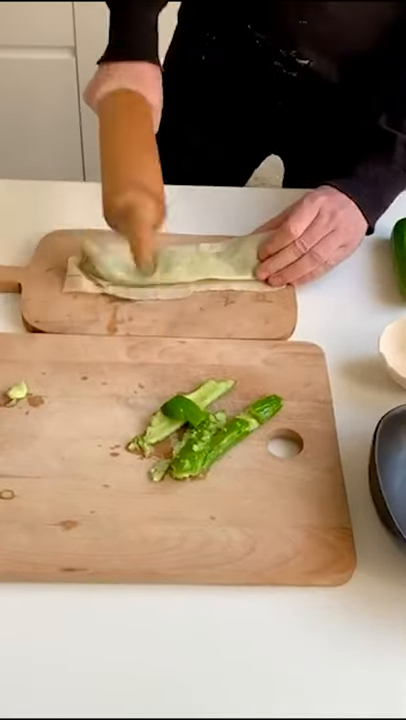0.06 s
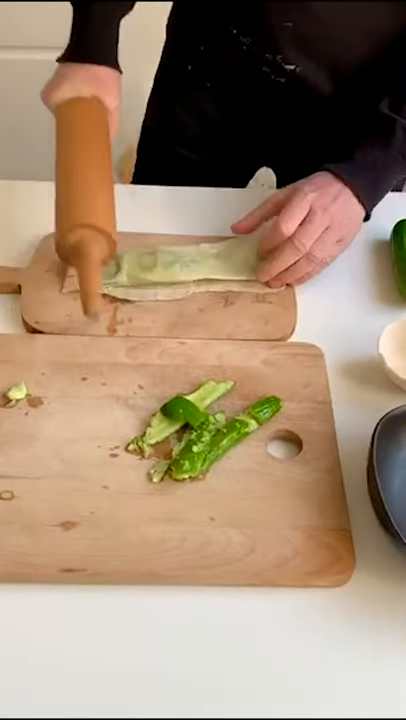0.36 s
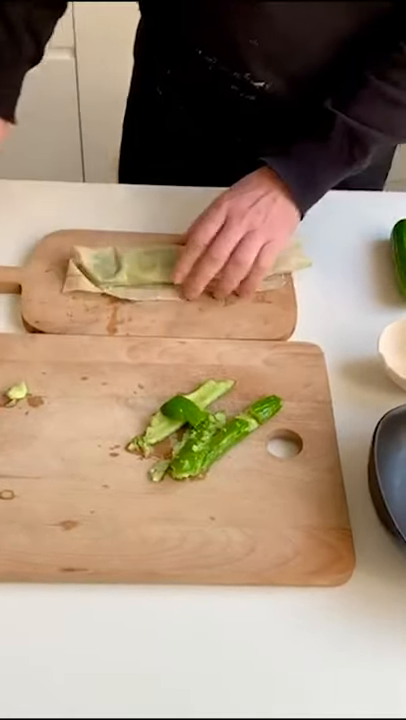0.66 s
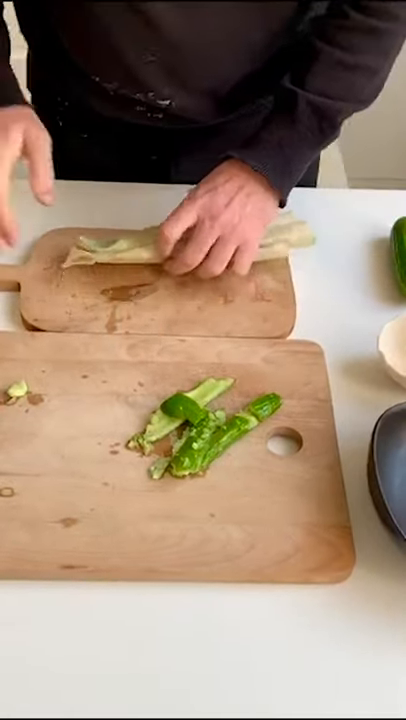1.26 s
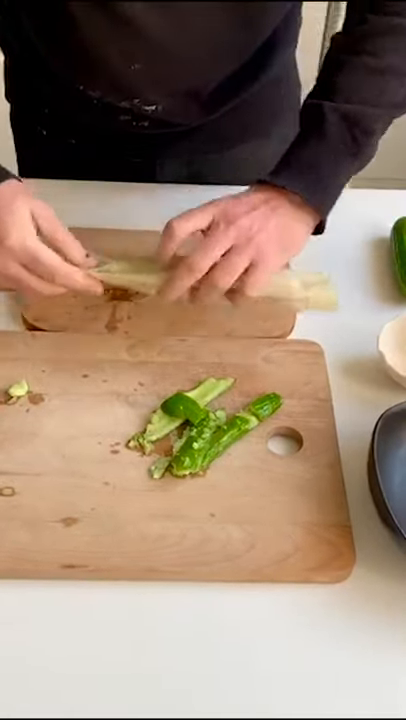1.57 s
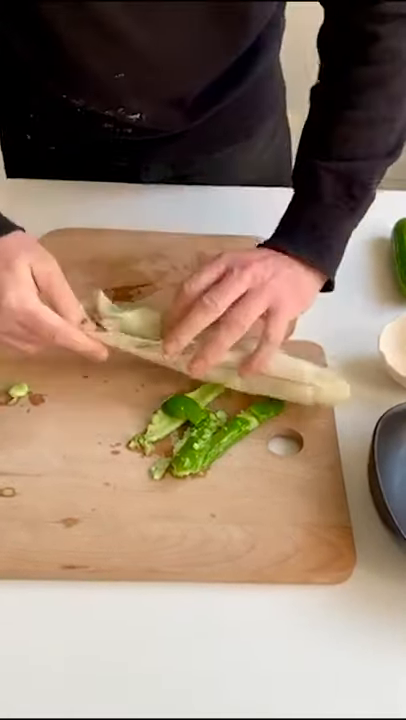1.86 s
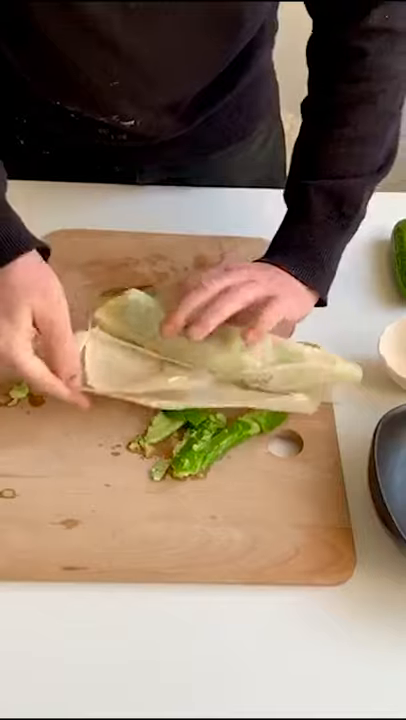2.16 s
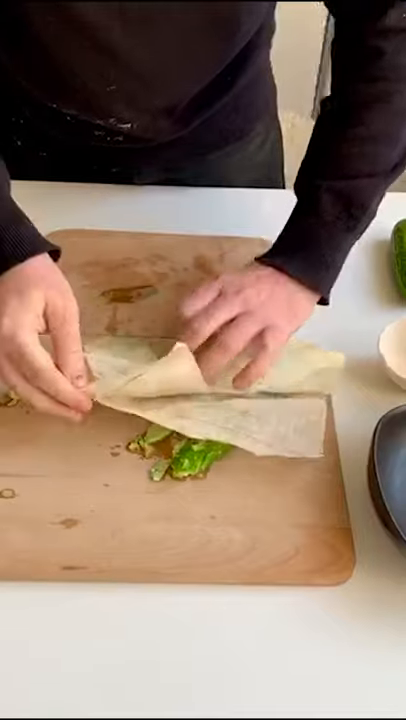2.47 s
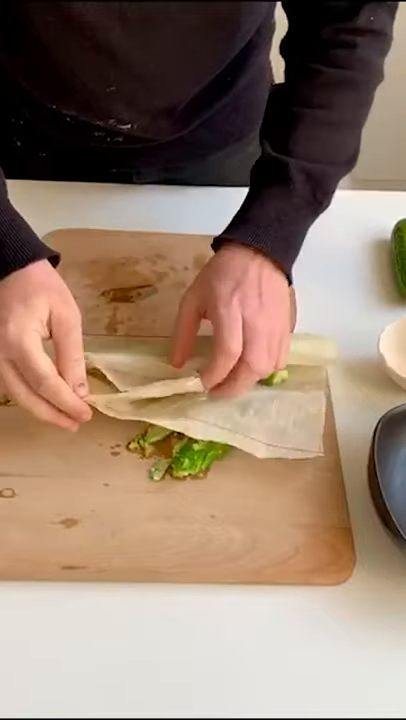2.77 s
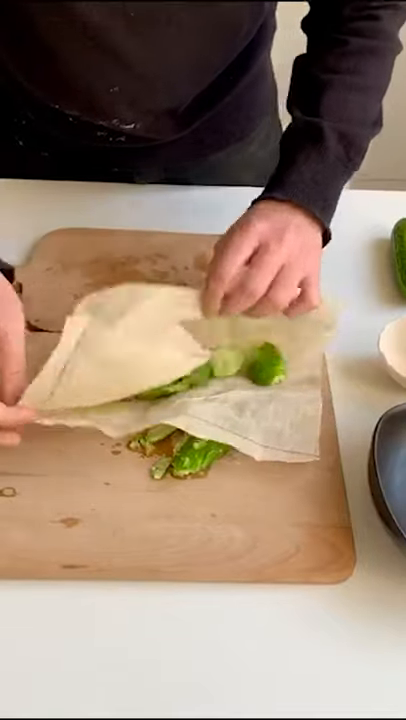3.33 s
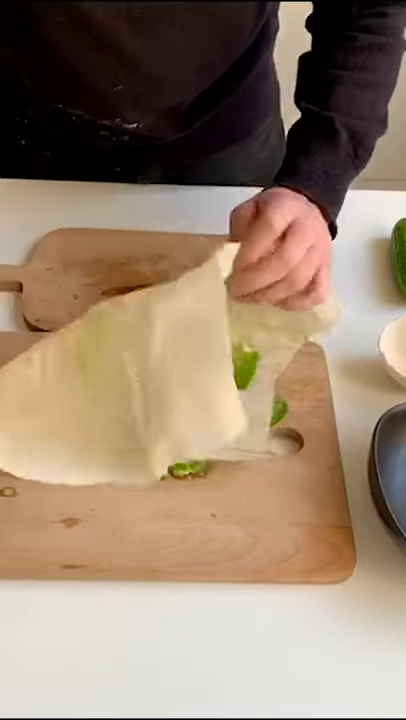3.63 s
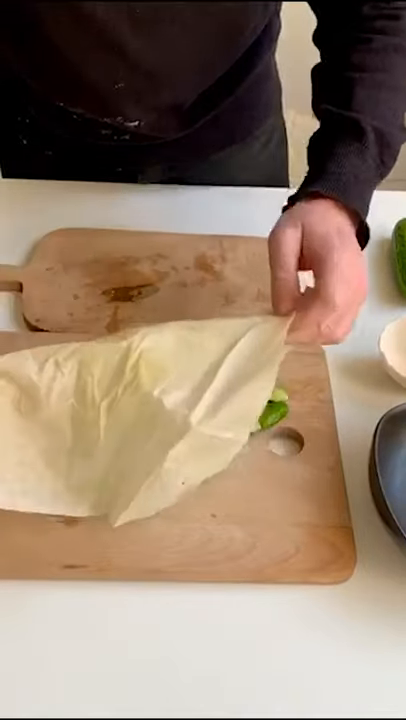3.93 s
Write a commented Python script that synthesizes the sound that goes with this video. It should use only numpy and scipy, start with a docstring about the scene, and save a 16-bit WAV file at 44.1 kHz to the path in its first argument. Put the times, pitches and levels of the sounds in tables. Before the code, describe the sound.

A wooden rolling pin thuds heavily on cloth-wrapped vegetables, strikes again more lightly, then is put down with two knocks. The wrap rustles faintly open and pieces drop softly onto the board in an echoing kitchen.

```python
"""A wooden rolling pin thuds on cloth-wrapped vegetables on a board, and the worktop booms under it.
The pin is put down with two knocks. Then the wrap is lifted, rustles open with small wet slips and
drops its pieces softly on the board. The place is a very live kitchen with a low hush, heard in
stereo, with the microphone far enough back that the room is about as loud as the direct knocks."""
import sys
import numpy as np
from scipy import signal
from scipy.fft import rfft, irfft
from scipy.io import wavfile
from scipy.ndimage import uniform_filter1d

SR = 44100
rng = np.random.default_rng(int(sys.argv[2]) if len(sys.argv) > 2 else 0)


def store_wav(level_fs):
    """Save 16-bit WAV to argv[1]."""
    pcm = np.round(np.clip(np.atleast_2d(level_fs), -1, 1) * 32767)
    wavfile.write(sys.argv[1], SR, pcm.T.astype(np.int16))


N = 176400
LEAD = SR // 10  # run-in before time zero [samples]
M = N + LEAD

# blows of the pin: (time [s], level [dB], bass [dB], clack [dB], crack [dB], contact [s], boom [dB])
KNOCKS = [(-.008, 9, 1.5, 6.5, 10, 0.0041, -17.5), (.007, 1, 10, -0.5, 8.5, 0.0021, -20),
          (.279, -6.5, 7, 6.5, 1.5, 0.0054, -76), (.33, -19.5, 15, -2.5, 12.5, 0.0031, -46),
          (0.8161, 3, 0.5, -2.5, -3, 0.003, -57), (0.993, -0.5, 4.5, 1, -4.5, .0035, -48.5)]
# ringing modes of board and pin: (frequency [Hz], level [dB])
WOOD_MODES = [(150, -10), (305, -7.5), (390, -8.5), (500, -4.5), (985, -7), (1400, -15), (3070, -22.5),
              (6660, -31.5)]
# spectrum of the push into the board: (frequency [Hz], level [dB])
PUSH_SPECTRUM = [(25, -20.5), (60, -2), (230, 0.5), (490, 4), (720, -2.5), (1000, -1), (1600, -9),
                 (2300, -15.5), (3800, -24.5), (15000, -49.5)]
# spectrum of the first touch of wood on wood: (frequency [Hz], level [dB])
CRACK_SPECTRUM = [(600, -27), (2500, -4), (7000, -15.5), (15000, -30)]
# kitchen reverberation: (frequency [Hz], time to fall 60 dB [s])
ROOM_T60 = [(60, 1.1), (300, 0.95), (1000, 1.044), (2500, 0.87), (6000, 0.53), (14000, 0.63)]
# what the walls return: (frequency [Hz], level [dB])
ROOM_COLOUR = [(70, -3.5), (230, 0), (450, 0), (720, -0.5), (1400, 0.5), (8000, -6)]
# likeness of the room sound left and right: (frequency [Hz], correlation [0-1])
LIKENESS = [(120, .993), (300, .9), (550, .5), (1000, .25), (1800, .4), (3000, .6), (4700, .9)]
# room tone: (frequency [Hz], level [dB])
HUSH_SPECTRUM = [(25, -14), (50, 0.5), (400, -9), (1000, -25.5), (3000, -30.5), (6000, -41), (15000, -56.5)]
# strokes of the wrap: (middle time [s], half length [s], level [dB], treble [dB])
RUSTLES = [(.035, 0.03, -28.5, -43), (0.259, 0.014, -30, -9), (1.464, 0.031, -71.5, 4),
           (1.656, 0.1, -75, 5), (1.883, 0.044, -63.5, 8), (2.154, 0.13, -71, -1), (2.36, 0.11, -70, 2),
           (2.581, 0.2, -68, -8), (2.869, 0.042, -65, 1), (3.131, 0.11, -68.5, 0),
           (3.383, 0.034, -64.5, 11), (3.78, 0.12, -67, -3.5)]
# snaps of vegetable and wrap: (time [s], level [dB], treble [dB])
SNAPS = [(.052, 6, -27), (0.078, -8, -4), (0.258, -17, 0), (2.509, -24, -25), (2.833, -34, -2.5),
         (2.868, -38.5, -14.5), (3.018, -47, -4.5), (3.157, -32, -4), (3.391, -29.5, -4), (3.708, -31, -19),
         (3.868, -33.5, -14)]
# colour of all rustles and snaps: (frequency [Hz], level [dB])
WRAP_SPECTRUM = [(200, -44.5), (600, 4), (1400, -4.5), (2500, -6), (3500, -1), (6000, -4), (8500, -12.5),
                 (11000, -14.5), (15000, -20.5)]
# pieces and fingers landing on the board: (time [s], level [dB], hollow pitch [Hz], boom [dB])
LANDINGS = [(1.869, -36.5, 404, -60), (2.192, -29.5, 243, -58), (2.451, -24.5, 776, -50),
            (2.544, -29.5, 292, -51.5), (3.191, -33.5, 249, -50.5), (3.803, -28, 872, -71.5)]
# spectrum of a cushioned landing: (frequency [Hz], level [dB])
LANDING_SPECTRUM = [(30, 2), (100, 24.5), (350, 23.5), (700, 7.5), (1500, 2), (4000, -34)]
# wet vegetable peeling off the wrap: (time [s], pitch [Hz], level [dB])
SQUELCHES = [(2.835, 905, -60.5), (2.871, 1254, -61), (3.352, 1450, -60.5), (3.378, 1667, -54),
             (3.389, 2268, -52)]
# phase between left and right, changing with frequency: (frequency [Hz], lead of the left [rad])
STEREO_PHASE = [(20, 0), (480, 0), (1000, -.6), (1400, -.3), (1800, 1.9), (2500, 2.3), (3700, 1.6),
                (4700, 3.14)]


def amp(db):
    """Decibels to gain."""
    return 10 ** (np.asarray(db) / 20)


def unit(x):
    """Scales to rms 1."""
    return x / np.sqrt(np.mean(x ** 2) + 1e-20)


def read(points, hz):
    """Reads a table on a log-frequency axis."""
    f, value = np.transpose(points)
    return np.interp(np.log(hz + 1), np.log(f + 1), value)


def add(mix, s, sound):
    """Mixes a sound in at time s."""
    part = mix[max(LEAD + round(s * SR), 0):][:len(sound)]
    part += sound[:len(part)]


def colour(x, points, size=4096):
    """Causal filter through (frequency [Hz], level [dB]) points."""
    log_gain = np.log(amp(read(points, abs(np.fft.fftfreq(size, 1 / SR)))))
    taps = np.fft.ifft(np.exp(np.conj(signal.hilbert(log_gain)))).real[:size // 2]
    return signal.fftconvolve(x, taps)[:len(x)]


def pair(a, b):
    """Two unrelated signals become a stereo pair, alike in the bass."""
    likeness = read(LIKENESS, np.fft.rfftfreq(len(a), 1 / SR))
    mid = rfft(a) * np.sqrt((1 + likeness) / 2)
    side = rfft(b) * np.sqrt((1 - likeness) / 2)
    return irfft([mid + side, mid - side], len(a))


def burst(t, fall_s):
    """A dying flurry of tiny contacts, energy 1."""
    x = rng.standard_normal(len(t)) * np.exp(-t / fall_s)
    return x / np.linalg.norm(x)


def crush(t, fall_s):
    """A contact that builds and lets go, even across the spectrum, energy 1."""
    x = burst(t, fall_s) * t
    for _ in range(4):
        flattened = irfft(np.exp(1j * np.angle(rfft(x))), len(t))
        x = flattened * np.exp(-(t / fall_s / 10) ** 2)
    return x / np.linalg.norm(x)


def board(db, bass_db, clack_db, crack_db, contact_s, ring_t60=0.03):
    """One blow cracks on the wood, pushes the board and rings its modes."""
    t = np.arange(SR // 3) / SR
    ring = sum((-1) ** k * amp(mode_db - 60 * t / ring_t60) * np.sin(2 * np.pi * hz * t)
               for k, (hz, mode_db) in enumerate(WOOD_MODES))
    push = colour(crush(t, contact_s), PUSH_SPECTRUM)
    crack = colour(burst(t, fall_s=0.0013), CRACK_SPECTRUM)
    hit = amp(-19) * ring + amp(13.5) * push + 0.44 * crack
    tone = [(130, bass_db), (450, 0), (1000, 0.024), (1800, clack_db), (8000, crack_db)]
    return amp(db) * colour(hit, tone)


def pin(room_db=-0.5):
    """Each knock of the pin lands in another place, so the room answers it differently."""
    out = np.zeros((2, M))
    for s, *blow, _ in KNOCKS:
        hit = np.zeros(M)
        add(hit, s, board(*blow))
        out += hit + amp(room_db) * kitchen(hit)
    return out


def worktop(hz=87.7, t60=1, rise_s=0.004):
    """The worktop's one deep mode swells and dies after each knock and landing."""
    out, t = np.zeros(M), np.arange(2 * SR) / SR
    boom = np.sin(2 * np.pi * hz * t) * (1 - np.exp(-t / rise_s)) * amp(-60 * t / t60)
    for s, *_, boom_db in KNOCKS + LANDINGS:
        add(out, s, amp(boom_db) * boom)
    return out


def kitchen(x, gap_s=0.003, early_db=6.5, early_s=0.26):
    """Dense reflections reach the microphone after a gap, each band dying at its own speed."""
    noise = pair(*rng.standard_normal((2, 3 * SR // 2)))
    hz, t, bands = signal.stft(noise, SR, nperseg=512)
    decay_db = early_db * np.exp(-t / early_s) - 60 * t / read(ROOM_T60, hz)[:, None]
    tail = signal.istft(bands * amp(read(ROOM_COLOUR, hz)[:, None] + decay_db), SR)[1]
    tail *= np.clip(np.arange(tail.shape[1]) / SR / gap_s - 1, 0, 1)
    return signal.fftconvolve(x[None], tail / np.linalg.norm(tail[0]), axes=1)[:, :M]


def room_tone(db=-65.5):
    """The low, steady hush of the kitchen."""
    hush = [colour(x, HUSH_SPECTRUM) for x in rng.standard_normal((2, M))]
    return amp(db) * unit(pair(*hush))


def crinkles(length, per_s=90, centre_hz=2100, octaves=0.7, fall_cycles=1.8, spread_db=3):
    """Damp folds let go, each a tiny pop of its own pitch; rms 1."""
    out, t = np.zeros(length), np.arange(SR // 100) / SR
    for place, pitch, size in rng.random((round(per_s * length / SR), 3)):
        hz = centre_hz * 2 ** (octaves * (2 * pitch - 1))
        pop = np.sin(2 * np.pi * hz * t) * np.exp(-hz * t / fall_cycles)
        part = out[int(place * length):][:len(t)]
        part += amp(-spread_db * np.log(size)) * pop[:len(part)]
    return unit(out)


def rustle(length, grains_per_s=1100, spread_db=0.5, rub_gain=0.17, clump_db=2.5, clump_s=0.014):
    """Moving cloth: fine crackle, crinkles and rubbing that come in clumps; rms 1."""
    ticks = rng.random(length) < grains_per_s / SR
    sizes = amp(spread_db * np.minimum(rng.exponential(1, length), 4))
    crackle = unit(ticks * sizes * rng.choice([-1, 1], length))
    drift = unit(uniform_filter1d(rng.standard_normal(length), round(clump_s * SR)))
    cloth = crackle + crinkles(length) + rub_gain * rng.standard_normal(length)
    return unit(cloth * amp(clump_db * drift))


def wrap():
    """The bundle snaps and rustles under the pin, and again as it is lifted and opened."""
    out, t = np.zeros(M), np.arange(SR // 10) / SR
    for s, db, treble_db in SNAPS:
        snap = 2 * burst(t, fall_s=0.0009)
        add(out, s, amp(db) * colour(snap, [(1500, 0.0055), (7000, treble_db)]))
    t = np.arange(-SR // 4, SR // 4) / SR
    for s, half_s, db, treble_db in RUSTLES:
        stroke = 2 * rustle(len(t)) * np.exp(-(t / half_s) ** 2)
        add(out, s + t[0], amp(db) * colour(stroke, [(1500, 0.0037), (7000, treble_db)]))
    return colour(out, WRAP_SPECTRUM)


def pieces(rise_s=0.005, hollow_db=-17.5, hollow_t60=0.036):
    """Dull, cushioned landings on the board, each with a brief hollow note."""
    out, t = np.zeros(M), np.arange(SR // 4) / SR
    for s, db, hz, _ in LANDINGS:
        note = amp(hollow_db - 60 * t / hollow_t60) * np.sin(2 * np.pi * hz * t)
        thud = colour(crush(t, fall_s=0.0032), LANDING_SPECTRUM)
        thud = colour(thud, [(hz / 10, -10), (hz / 2, 0)])  # smaller, higher pieces carry less bass
        add(out, s, amp(db) * (thud + note) * (1 - np.exp(-t / rise_s)))
    return out


def squelches(half_s=0.0066, width_hz=190, rise_hz_per_s=13000):
    """Brief wet slips, each in one resonance that rises as the gap closes."""
    out, t = np.zeros(M), np.arange(-SR // 10, SR // 10) / SR
    resonance = 1 / (1 + (2 * np.fft.rfftfreq(len(t), 1 / SR) / width_hz) ** 2)
    swell = np.exp(-(t / half_s) ** 2)
    for s, pitch_hz, db in SQUELCHES:
        flutter = irfft(rfft(rng.standard_normal(len(t))) * resonance, len(t))
        slip = flutter * np.cos(2 * np.pi * (pitch_hz + rise_hz_per_s * t / 2) * t)
        add(out, s + t[0], amp(db) * unit(slip * swell) * np.std(swell))
    return out


def scene():
    """Pin, worktop, wrap and vegetables, with the kitchen around them."""
    landings, cloth, wet = pieces(), wrap(), squelches()
    reflections = kitchen(amp(1) * landings + amp(-5.5) * cloth + amp(-11.5) * wet)
    return (pin() + worktop() + cloth + landings + wet + reflections + room_tone())[:, LEAD:]


def record(dry, treble_delay_s=0.000235, balance_db=-0.8, cut_hz=15800):
    """Left and right shift in phase against each other, differently at each frequency; the left is slightly
    quieter and the top is cut."""
    hz = np.fft.rfftfreq(M, 1 / SR)
    above_table_hz = np.maximum(hz - STEREO_PHASE[-1][0], 0)
    phase = read(STEREO_PHASE, hz) + 2 * np.pi * treble_delay_s * above_table_hz
    left = np.exp(0.5j * phase) * amp(balance_db / 2)
    wide = irfft(rfft(dry, M) * np.array([left, 1 / left]), M)[:, :N]
    lowpass = signal.firwin(511, cut_hz, window=("kaiser", 9), fs=SR)
    return signal.oaconvolve(wide, lowpass[None], "same")


dry = scene()
out = record(dry)
store_wav(out)
```